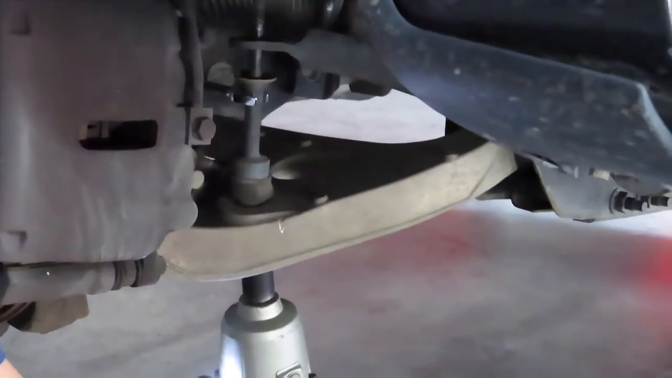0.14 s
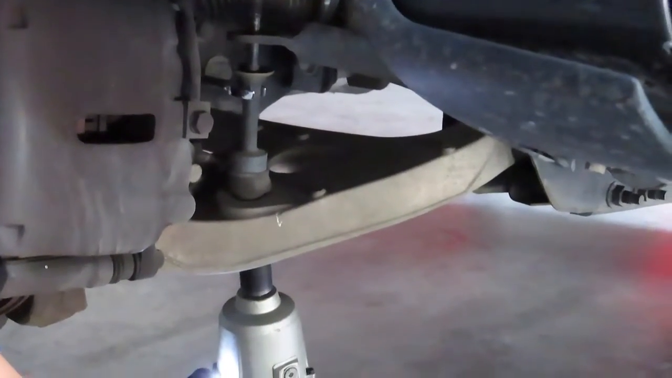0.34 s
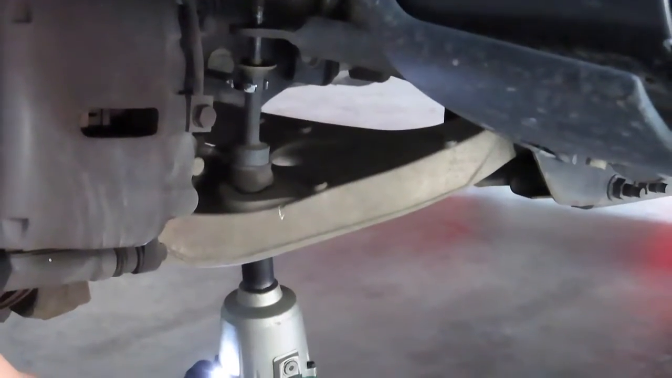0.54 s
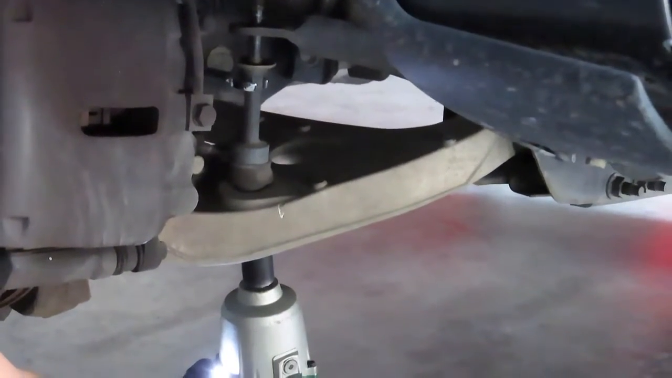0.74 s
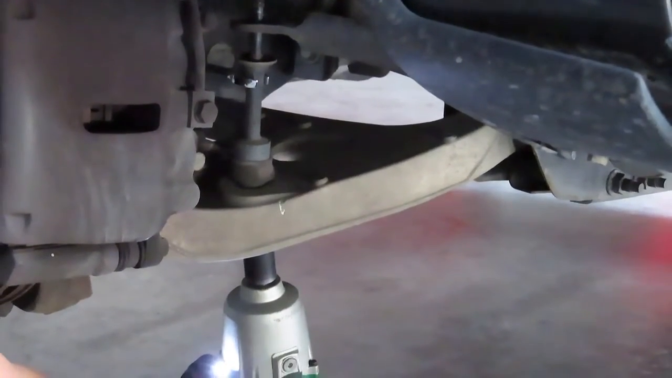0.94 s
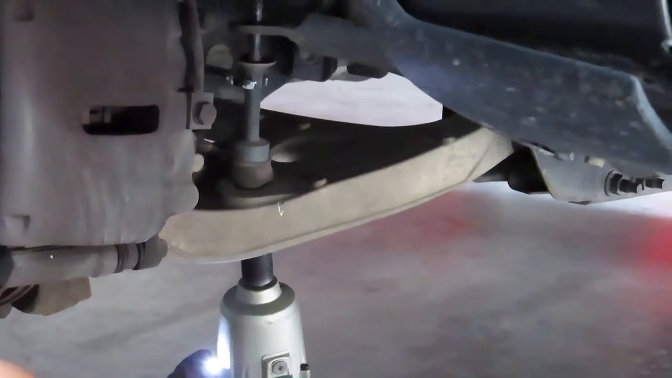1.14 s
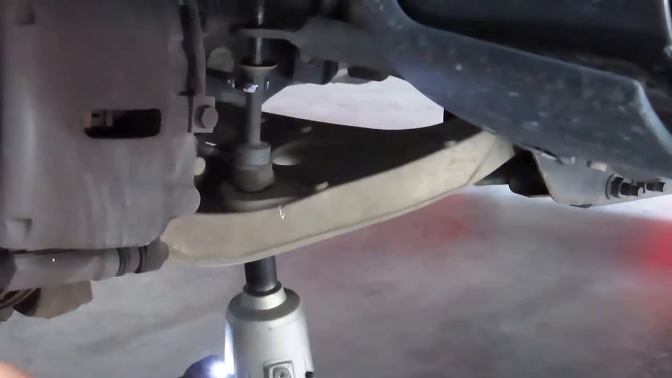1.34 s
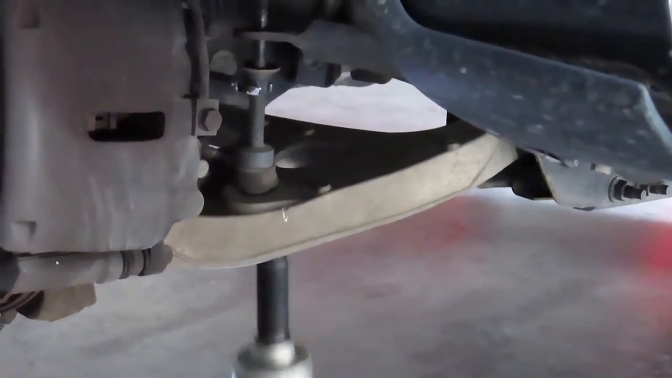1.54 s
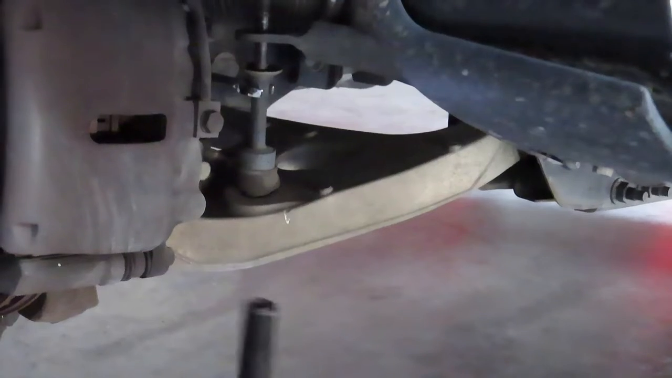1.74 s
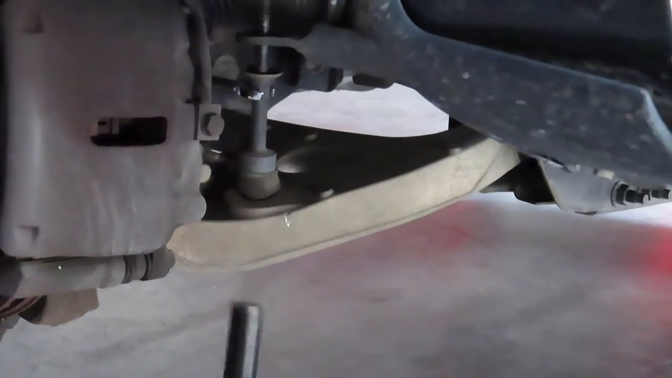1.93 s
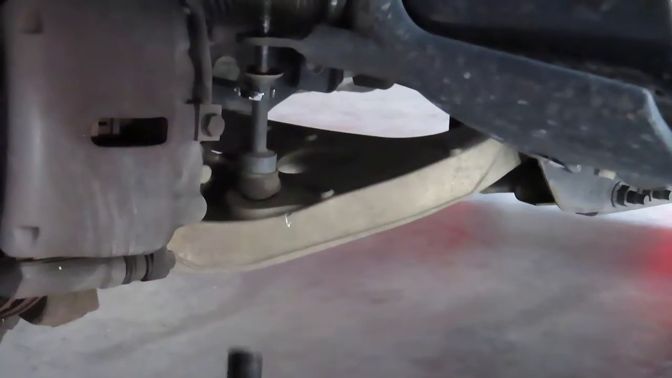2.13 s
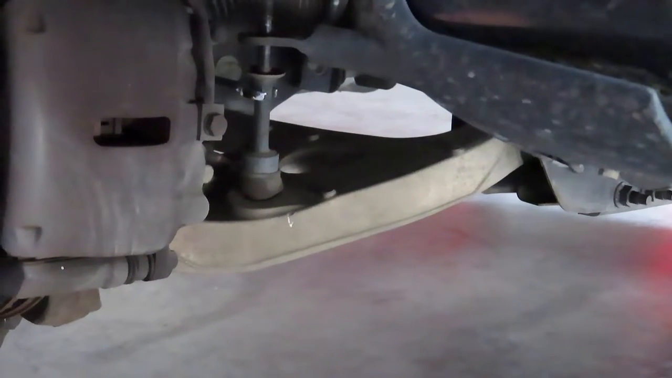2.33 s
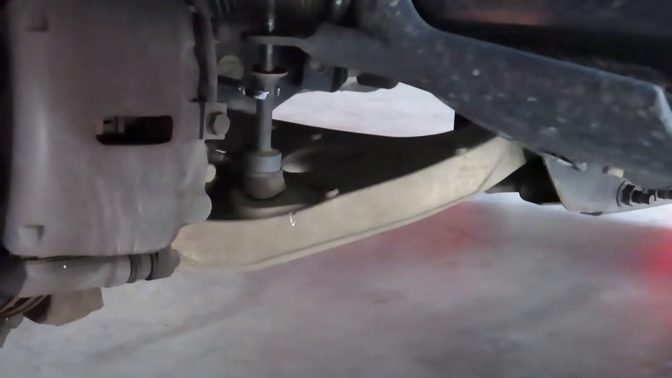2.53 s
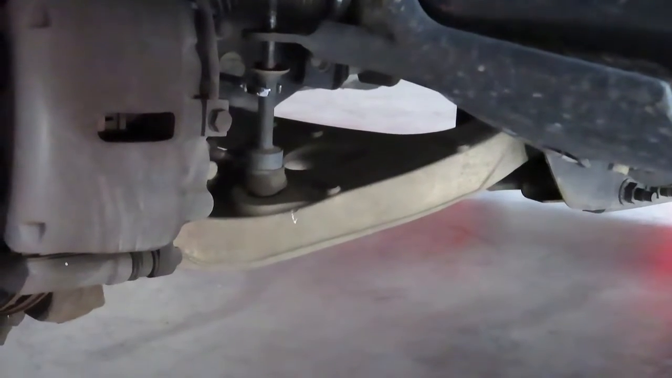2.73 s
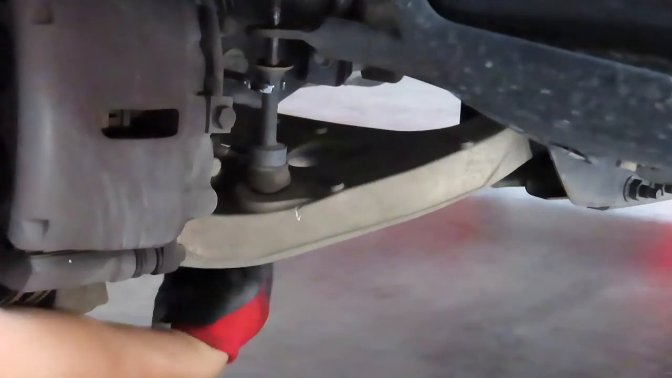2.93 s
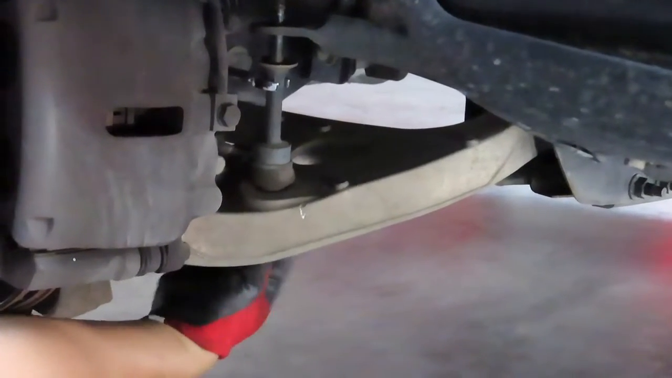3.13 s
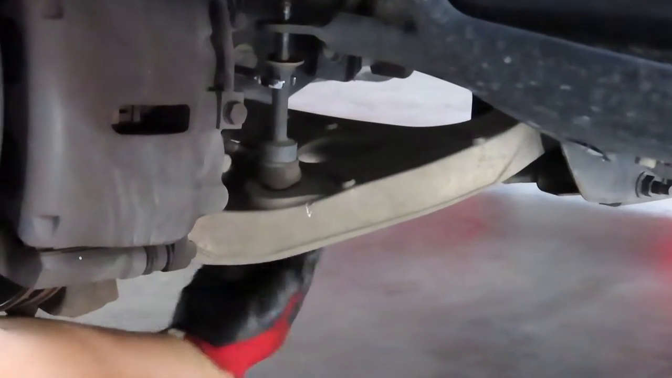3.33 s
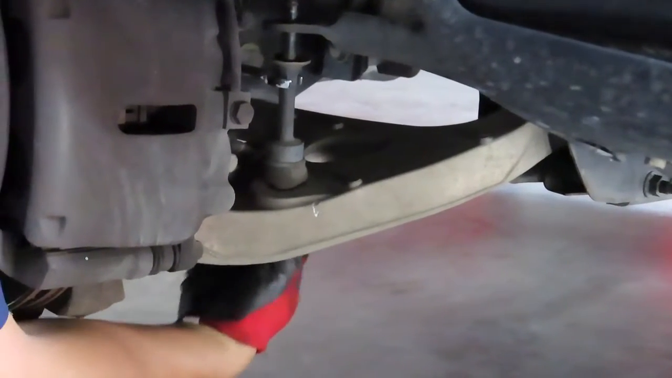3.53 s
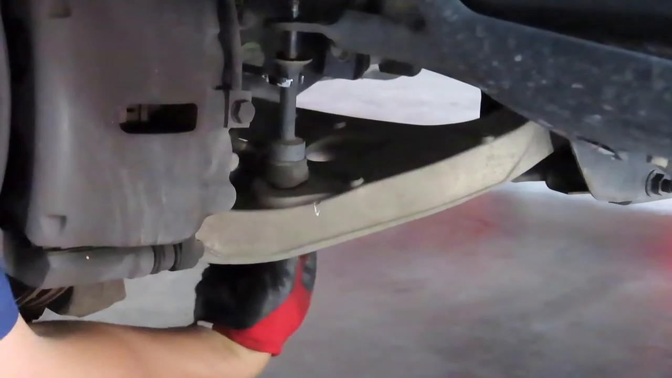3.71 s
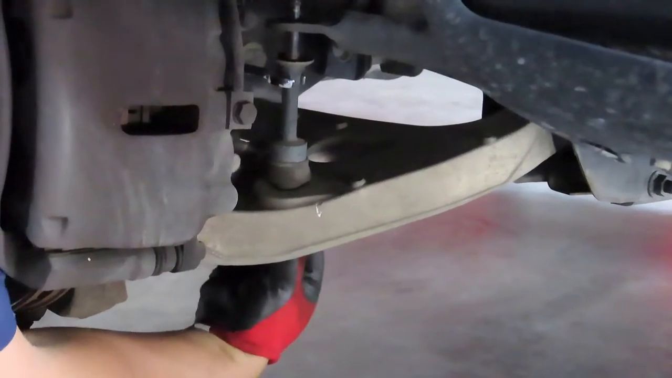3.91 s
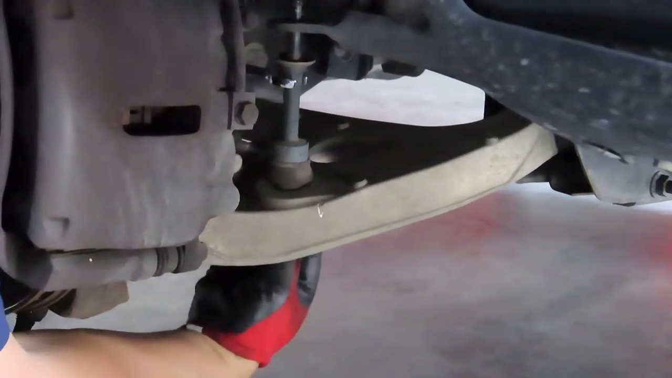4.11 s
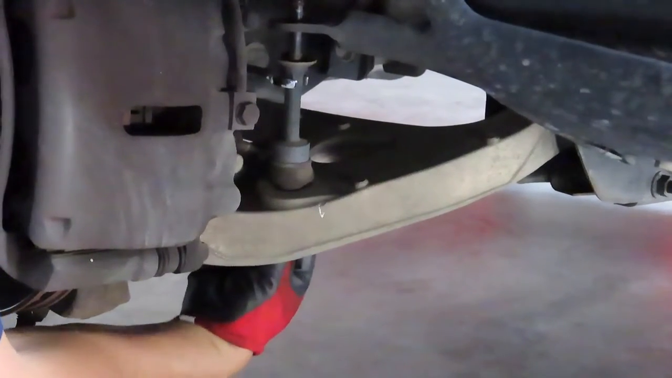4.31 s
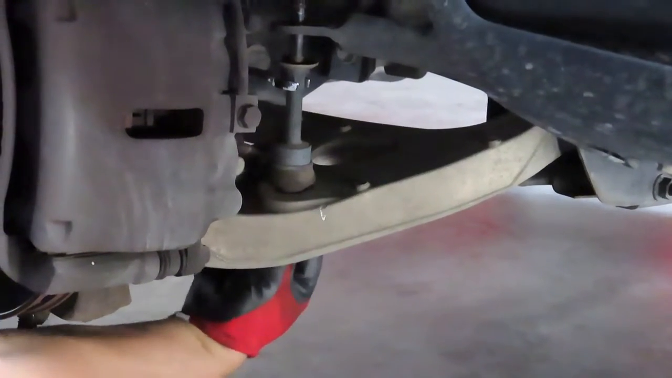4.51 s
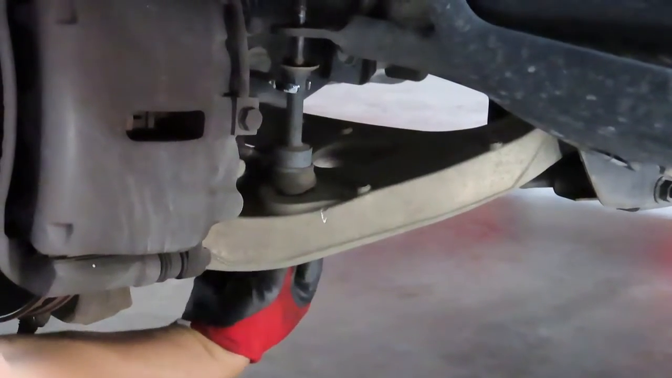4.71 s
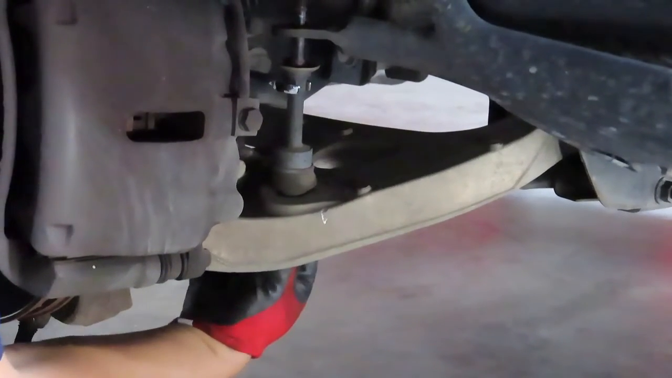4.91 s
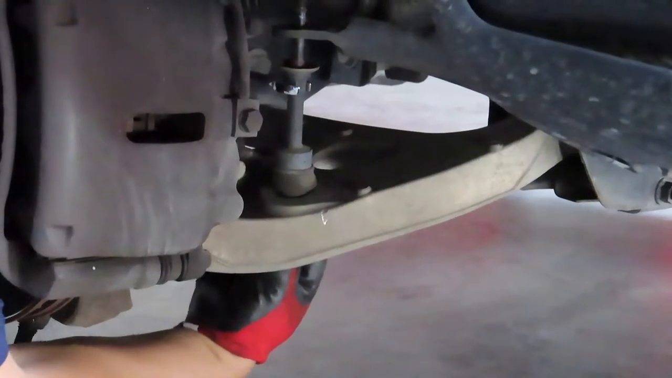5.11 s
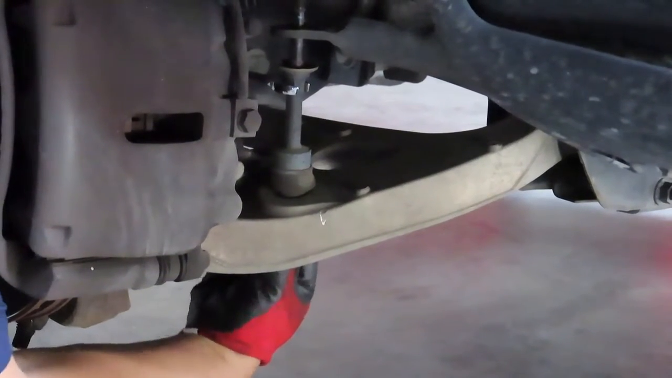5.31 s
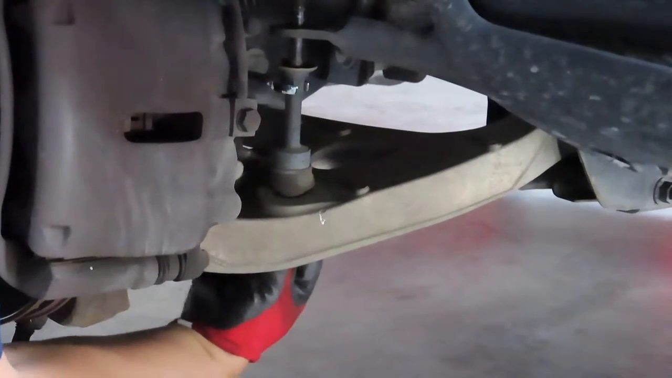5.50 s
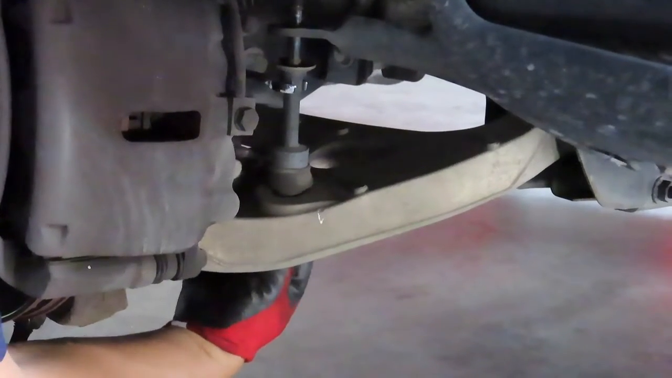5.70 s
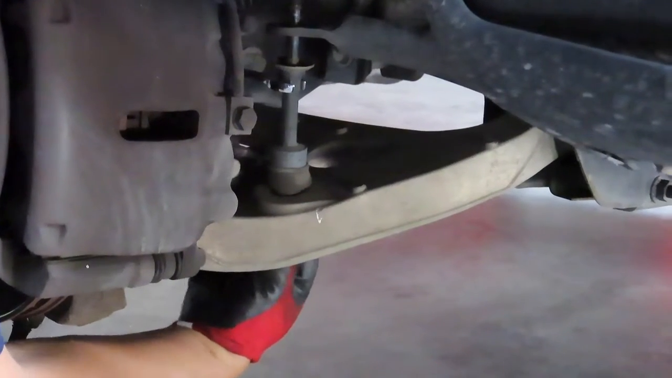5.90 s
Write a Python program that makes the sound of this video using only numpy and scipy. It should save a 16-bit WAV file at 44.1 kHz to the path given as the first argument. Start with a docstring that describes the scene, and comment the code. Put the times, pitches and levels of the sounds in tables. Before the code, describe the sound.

Close under a vehicle, a cordless driver whines steadily with a throbbing gear and rattling socket. It knocks off the nut, whirs freely higher, then coasts down in pitch. Several hard clacks follow as it is laid on concrete. A glove rustles faintly while a distant bird chirps over low traffic rumble.

```python
"""A cordless driver spins a nut off under a car: shaft-locked tones whine, a gear throbs once a turn
and noise patterned by the turn makes the socket rattle. Pulled off with a knock, it whirrs in coloured
noise, coasts down and is laid on concrete; knocks are cracking noise and ringing housing modes. A glove
rustles in grainy noise; a far bird sings two phrases of gliding sines over a rumble of filtered noise."""
import sys
import numpy as np
from scipy import signal
from scipy.fft import rfft, irfft, next_fast_len
from scipy.io import wavfile
from scipy.ndimage import uniform_filter1d

SR = 44100
rng = np.random.default_rng(int(sys.argv[2]) if len(sys.argv) > 2 else 0)


def wrap_up_sound(samples):
    """Save the sound to the file named by the first command line argument, as 16-bit audio."""
    columns = np.atleast_2d(samples).T
    # keep every value between -1 and 1, then stretch to whole-number steps
    tamed = np.clip(columns, -1, 1)
    steps = np.round(tamed * 32767).astype(np.int16)
    wavfile.write(sys.argv[1], SR, steps)


N = 262420
T = np.arange(N) / SR

# traffic spectrum: f/Hz, relative density level/dB
TOWN_COLOUR = [(20, -15.5), (59, -3), (90, -1), (148, -6), (210, -14.5), (349, -20.5), (666, -20),
               (1570, -34), (3500, -39.5), (7300, -50.5), (15500, -61)]
TOWN_DB = -36.5  # rms of the mid
# width of the traffic: f/Hz, side against mid level/dB
TOWN_WIDTH = [(60, -80.5), (200, -17), (380, -10.5), (2400, -6), (8000, -1.5)]
# width of the near sounds: f/Hz, side against mid level/dB
NEAR_WIDTH = [(100, -64.5), (300, -39.5), (1200, -47.5), (3000, -52.5), (5000, -41.5), (8000, -10),
              (13000, -5.5)]
TOP_HZ = 15550

# notes of the bird's phrase: t/s after its start, length/s before any stretch,
# start f/Hz and end f/Hz before the pitch ratio, level/dB on top of the phrase's
BIRD_NOTES = [(-.02, .16, 3150, 3950, -6), (.03, 0.12, 4450, 4430, -6), (.09, .1, 4200, 3400, -6),
              (.15, .17, 3500, 3100, -9)]
# bird phrases: t/s, level/dB, stretch of the held second note (ratio), pitch ratio
BIRD_PHRASES = [(3.239, -45, 1.66, 1.), (3.684, -43.5, 1.16, 0.98)]
# lone high note: t/s, length/s, start f/Hz, end f/Hz, level/dB
HIGH_PEEP = (5.2, .031, 7203, 7528, -57)
# faint far squeal: t/s, f/Hz, level/dB
FAR_SQUEAL = [(5.6, 1715, -70), (5.95, 1810, -60)]

# glove and sleeve: t/s, length/s, level/dB
CLOTH_BURSTS = [(2.904, 0.035, -42), (3.076, 0.035, -51.5), (3.155, 1, -56), (3.21, 0.067, -52.5),
                (3.355, 0.06, -50.5), (3.568, 0.09, -61), (3.646, 0.022, -48), (4.193, 0.083, -56),
                (4.29, .03, -54), (4.863, 0.0074, -48), (4.87, .06, -57), (4.897, 0.0073, -49),
                (5.067, 0.088, -62)]
# socket pulling off the nut, then the tool set down on concrete:
# t/s, crack level/dB, crack centre f/Hz, crack t60/s, thud level/dB, thud centre f/Hz
TOOL_KNOCKS = [(1.558, -16, 7000, 0.039, -26, 490), (1.609, -3, 2140, 0.04, -10, 490),
               (2.099, -38, 397, 0.022, -17, 168), (2.5608, 0, 2470, 0.016, -3.5, 158),
               (2.6234, -1, 2300, 0.022, 2, 360), (2.6299, 3.5, 2400, 0.013, -22, 340),
               (2.686, -16, 1500, 0.026, -13.5, 347), (2.779, -14.5, 910, 0.031, -14, 405),
               (2.7997, -18, 3360, 0.011, -17, 395), (2.819, -5, 2150, 0.0055, -13.5, 299.3),
               (2.8931, -19.5, 784, 0.04, -23, 550)]
# housing modes, low to high: f/Hz, relative level/dB, t60/s
HOUSING_MODES = [(124, -5.5, 0.14), (186.9, 3.5, 0.036), (359, 5.5, 0.031), (474, 5, 0.014),
                 (550, 8, 0.033), (834, 10.5, 0.03), (1900, 7.5, 0.015), (3280, 4, 0.016)]
LOW_MODES = 5  # these make the thud, the rest ring with the crack

# air noise spectrum, also shaping the faint shaft lines: f/Hz, relative density level/dB
AIR_COLOUR = [(150, -9), (480, -16.5), (640, -3), (1550, -0.5), (2150, -3), (3300, -0.5), (5700, -14),
              (8500, -17.5), (15500, -37.5)]
WHIRR_DB, WHIRR_DB_PER_OCTAVE = -26.5, 3.5  # at free speed, and per octave of speed
TREBLE_DB, TREBLE_DB_PER_OCTAVE = 2, -1  # whirr's treble against its body
STOP_HZ = 150  # the fan dies away below this whine
SCRAPE_S, SCRAPE_LENGTH_S, SCRAPE_DB = 2.79, 0.16, -39

# gear throb: t/s, depth 0-1, lead on the motor/turns
GEAR_THROB = [(0, 0.89, 0.31), (.12, 0.89, 0.38), (.2, 0.01, 0.15), (.33, 0.88, 0.012), (.5, 0.96, -0.016),
              (.65, 0.39, 0.015), (.8, 0.98, 0.044), (.92, 0.92, 0.13), (1, 0.48, .14), (1.17, 0.34, 0.26),
              (1.27, 0.48, 0.4), (1.5, 0.51, 0.52)]
# gear overtones: multiple of the mesh tone, mean level/dB against it
MESH_OVERTONES = [(2, -14.5), (3, -19), (6, -28)]
GEAR_DB, GEAR_RISE_DB_PER_S = -17.5, 3
THROB_LOSS_DB, THROB_SAG_HZ = 5.5, 18  # a deeper throb is quieter and a little lower
GEAR_START_TURN, MESH_PER_WHINE, WHINES_PER_TURN = -.15, .553, 121
# socket rattle spectrum: f/Hz, relative density level/dB
SOCKET_COLOUR = [(60, -12.5), (240, -8.5), (500, -11), (1400, -8.5), (2100, -16), (2700, -8.5), (3300, -16),
                 (4200, -19), (6300, -25), (9700, -29), (15500, -41.5)]
# socket resonances: f/Hz, width f/Hz, relative level/dB
SOCKET_RINGS = [(234, 21, -12.5), (371, 8.6, -13), (1613, 30, -10.5), (2870, 28, -12.5), (4010, 380, -11.5),
                (6980, 110, -26), (9630, 16, -18.5), (11300, 73, -31.5)]
RATTLE_DB, RATTLE_SAG_DB_PER_S, RATTLE_THROB_DB = -17, 0.38, 0.5
RATTLE_LOOSE_DB = 2.5  # the rattle drops once the nut is free
RATTLE_END_S, RATTLE_RELEASE_S = 1.641, 0.037

# whine on the nut, 10 x shaft speed: t/s, f/Hz
LOADED_WHINE = [(0, 2600), (.3, 2510), (1.05, 2548), (1.5, 2553)]
SLIP_OFF_S, FREE_HZ, SPIN_UP_S = 1.515, 2885, .038
TRIGGER_OFF_S, DRAG_PER_S, FRICTION_HZ_PER_S = 1.872, .95, 1615
# loudness of the whine as the tool is moved about: t/s, relative level/dB
WHINE_LEVEL = [(0, -3), (.3, -1), (1.1, -2), (1.5, -1.5), (1.56, 0), (1.65, -1), (1.71, -4.5), (1.78, -5.5),
               (1.82, 0), (1.9, -4.5), (1.97, 0), (2.05, -5), (2.13, -1), (2.3, -2.5), (2.42, 0.5),
               (2.5, 2.5), (2.575, -2), (2.76, -13)]
# motor tones: multiple of the whine, level/dB at free speed before the body, level lost/dB per octave of slowing
MOTOR_TONES = [(.1, -45.5, 5.5), (.25, -52, 4), (.55, -39.5, 8.5), (1, -28, 6.5), (1.5, -45, 13.5),
               (2, -45.5, -6.5), (3, -43, 9), (4, -53.5, 6.5), (4.5, -59.5, 21.5), (5, -55, -5),
               (6, -58, 4), (7, -54.5, 8), (8, -62.5, 6)]
# body resonances lifting a tone: f/Hz, width f/Hz, boost level/dB
BODY_RESONANCES = [(690, 364, 15), (2487, 156, 6), (2856, 180, 9), (3388, 330, 11.5), (4010, 500, 14.5),
                   (4347, 76, 11), (6940, 2700, 10.5), (7680, 1300, 0.5), (11700, 695, 3.5),
                   (13200, 1000, 4.5)]
# brief fades of single tones as the tool is turned: multiple of the whine, middle t/s, length/s, level/dB
TONE_FADES = [(1, 1.27, .09, -12), (1.5, 1.845, .07, -18), (3, 1.77, .09, -16), (1, 2.28, .08, -10),
              (5, 2.63, .14, -15), (2, 2.72, .26, -12), (2, 1.98, .12, -8)]
COMB_DB, COMB_STEP = -48, .2  # faint lines at every second shaft order, before air colour


def undb(db):
    """Turns dB into gain."""
    return 10 ** (np.asarray(db) / 20)


def unit(x):
    """Scales to rms 1."""
    return x / np.sqrt(np.mean(x ** 2))


def at_hz(points, hz):
    """Reads (f/Hz, level/dB) points on a log-frequency axis."""
    f, db = np.transpose(points)
    return np.interp(np.log(np.maximum(hz, 1)), np.log(f), db)


def curves(rows):
    """Draws a table's columns per sample; a gain that closes outside the table comes first."""
    s, *columns = np.transpose(rows)
    gate = np.interp(T, [s[0] - .03, s[0], s[-1], s[-1] + .03], [0, 1, 1, 0])
    return [gate] + [np.interp(T, s, column) for column in columns]


def colour(x, points):
    """Weights the spectrum by (f/Hz, level/dB) points."""
    n = next_fast_len(len(x), True)
    hz = np.arange(n // 2 + 1) * SR / n
    return irfft(rfft(x, n) * undb(at_hz(points, hz)), n)[:len(x)]


def band(x, hz, width_hz):
    """Resonates with gain 1 at the centre."""
    return signal.lfilter(*signal.iirpeak(hz, hz / width_hz, fs=SR), x)


def high_pass(x, hz):
    """Rolls off below hz at 12 dB an octave."""
    return signal.sosfilt(signal.butter(2, hz, "high", fs=SR, output="sos"), x)


def walk(rate):
    """Wanders between random levels held 1 / rate s and slewed twice; spread near 1."""
    hold = int(SR / rate)
    steps = np.repeat(rng.standard_normal(N // hold + 1), hold)
    return 1.516 * uniform_filter1d(uniform_filter1d(steps, hold), hold)[:N]


def echoes(x, t60, damp_hz):
    """Smears x into a diffuse tail: a dulled, decaying noise response of unit energy."""
    t = T[:SR // 2]
    tail = rng.standard_normal(len(t)) * 1000. ** (-t / t60)
    tail = signal.lfilter(*signal.butter(1, damp_hz, fs=SR), tail)
    return signal.oaconvolve(x, tail / np.linalg.norm(tail))[:N]


def whine_hz():
    """Whine pitch: sags on the nut, spins up when freed, coasts down against drag and friction."""
    hz = curves(LOADED_WHINE)[1]
    hz = hz + (FREE_HZ - hz) * (1 - np.exp(-(T - SLIP_OFF_S).clip(0) / SPIN_UP_S))
    offset_hz = FRICTION_HZ_PER_S / DRAG_PER_S
    coast = np.exp(-DRAG_PER_S * (T - TRIGGER_OFF_S).clip(0))
    return ((hz + offset_hz) * coast - offset_hz).clip(1)


def freeing():
    """Ramps 0 to 1 as the tool slips off the nut."""
    return np.clip((T - SLIP_OFF_S) / SPIN_UP_S, 0, 1)


def town():
    """Traffic rumble: low-weighted noise that swells slowly; mid and side."""
    mid, side = (colour(rng.standard_normal(N) * undb(.6 * walk(3) + walk(14)), TOWN_COLOUR)
                 for _ in range(2))
    return undb(TOWN_DB) * np.array([mid, colour(side, TOWN_WIDTH)]) / np.sqrt(np.mean(mid ** 2))


def far_tones():
    """Bird notes as sines whose glides warble, and a faint wavering squeal."""
    out, tremble = np.zeros(N), walk(200)
    notes = [HIGH_PEEP]
    for start, phrase_db, stretch, ratio in BIRD_PHRASES:
        for k, (s, length, hz0, hz1, db) in enumerate(BIRD_NOTES):
            length = length * (stretch if k == 1 else 1)
            notes.append((start + s, length, ratio * hz0, ratio * hz1, phrase_db + db))
    for s, length, hz0, hz1, db in notes:
        i, u = int(s * SR), np.linspace(0, 1, int(length * SR))
        warble_hz = (24 + .3 * abs(hz1 - hz0)) * tremble[i:i + len(u)]
        phase = 2 * np.pi * np.cumsum(hz0 + (hz1 - hz0) * u + warble_hz) / SR
        out[i:i + len(u)] += undb(db) * np.sin(np.pi * u) ** .5 * np.sin(phase)
    gate, hz, db = curves(FAR_SQUEAL)
    squeal_phase = 2 * np.pi * np.cumsum(hz * (1 + 0.0111 * walk(90))) / SR
    return out + gate * undb(db) * np.sin(squeal_phase)


def rustles():
    """Cloth and rubber: soft bursts of noise made grainy by random sample levels."""
    grit = rng.standard_normal(N) * undb(1.6 * rng.exponential(size=N))
    # the power below 1 makes each burst rise fast and fade slowly
    swell = sum(undb(db) * np.sin(np.pi * np.clip((T - s) / length, 0, 1) ** 0.41)
                for s, length, db in CLOTH_BURSTS)
    return swell * unit(colour(grit, [(200, -44), (1500, 8.0), (5000, -1.5), (14000, -21.0)]))


def knocks():
    """Blows of tick, crack, thud and housing ring; modes near the thud and crack centres ring most."""
    out, t = np.zeros(N), T[:SR // 5]
    modes = np.array([undb(db) * np.sin(2 * np.pi * f * t) * 1000. ** (-t / t60)
                      for f, db, t60 in HOUSING_MODES])
    mode_hz = np.array(HOUSING_MODES)[:, :1]
    for s, crack_db, crack_hz, decay, thud_db, thud_hz in TOOL_KNOCKS:
        noise = rng.standard_normal(len(t))
        crack = band(band(noise, crack_hz, 1.1 * crack_hz), crack_hz, 1.04 * crack_hz)
        crack = crack * 1000. ** (-t / decay)
        tick = 0.17 * noise * 1000. ** (-t / 0.0031)
        octaves_off = np.abs(np.log2(mode_hz / np.where(mode_hz < 700, thud_hz, crack_hz)))
        ring = modes * undb(2 * rng.standard_normal((len(modes), 1)) - 10.1 * octaves_off)
        thud = sum(ring[:LOW_MODES])
        blow = undb(crack_db) * (crack / np.abs(crack).max() + tick + .3 * sum(ring[LOW_MODES:]))
        blow = blow + undb(thud_db) * thud / np.abs(thud).max()
        i = int(s * SR)
        out[i:i + len(t)] += blow * np.minimum(t / .0005, 1)
    return out


def whirr():
    """Air and bearing noise of the free motor, sinking with speed; a brief scrape as the tool settles."""
    hz = whine_hz()
    speed, octaves = hz / FREE_HZ, np.log2(hz / FREE_HZ)
    shaft = np.cos(2 * np.pi * np.cumsum(hz) / SR / 10)  # the noise pulses once a shaft turn
    pulsed = rng.standard_normal(N) * undb(.9 * walk(40) + 3 * shaft * speed)
    air = unit(colour(pulsed, AIR_COLOUR))
    treble = high_pass(air, 5000)
    running = freeing() * np.clip(hz / STOP_HZ, 0, 1)
    fan = running * undb(WHIRR_DB + WHIRR_DB_PER_OCTAVE * octaves)
    scrape = undb(SCRAPE_DB) * np.sin(np.pi * np.clip((T - SCRAPE_S) / SCRAPE_LENGTH_S, 0, 1))
    treble_gain = undb(TREBLE_DB + TREBLE_DB_PER_OCTAVE * octaves)
    return (fan + scrape) * (air - treble) + fan * treble_gain * treble


def gear_turn():
    """Gear angle in turns, and its throb: an off-centre gear swells once a turn."""
    _, depth, lead = curves(GEAR_THROB)
    turn = np.cumsum(whine_hz()) / SR / WHINES_PER_TURN + GEAR_START_TURN + lead
    throb = 1 + depth * (np.cos(2 * np.pi * turn) + 0.62 * np.cos(4 * np.pi * turn - .4))
    return turn, throb


def gear(throb):
    """Tooth-mesh tone and overtones that follow the motor speed, shaken by the throb."""
    gate, depth, _ = curves(GEAR_THROB)
    hz = MESH_PER_WHINE * whine_hz() - THROB_SAG_HZ * depth
    phase = 2 * np.pi * np.cumsum(hz * (1 + 0.00323 * walk(40.2))) / SR
    tone = np.sin(phase)
    for m, overtone_db in MESH_OVERTONES:
        tone = tone + undb(overtone_db + 3 * walk(30)) * np.sin(m * phase)
    db = GEAR_DB + GEAR_RISE_DB_PER_S * T - THROB_LOSS_DB * depth
    return gate * undb(db + 1.15 * walk(27.64)) * throb * tone


def socket_rattle(turn, throb):
    """Socket chatter: noise slaps that partly repeat each turn, coloured and ringing on the nut."""
    pattern = rng.standard_normal(2048)[(turn % 1 * 2048).astype(int)]
    slaps = 0.73 * pattern + rng.standard_normal(N)
    slaps = slaps * undb(walk(150) + RATTLE_THROB_DB * throb)
    rings = sum(undb(db) * unit(band(slaps, f, width)) for f, width, db in SOCKET_RINGS)
    on_nut = curves(GEAR_THROB)[0]
    chatter = unit(colour(slaps, SOCKET_COLOUR)) + .5 * rings * on_nut
    release = np.clip(1 - (T - RATTLE_END_S) / RATTLE_RELEASE_S, 0, 1)
    db = RATTLE_DB - RATTLE_SAG_DB_PER_S * T - RATTLE_LOOSE_DB * freeing()
    return release * undb(db) * chatter


def motor():
    """Shaft-locked tones, dulled and trembling more under load, that flicker and swell at resonances."""
    n = int(3 * SR)  # the whine is silent after this
    gate, whine_db, hz, load = (x[:n] for x in (*curves(WHINE_LEVEL), whine_hz(), curves(GEAR_THROB)[0]))
    tremble = (0.0012 + 0.0028 * load) * walk(90)[:n]
    phase = 2 * np.pi * np.cumsum(hz * (1 + tremble)) / SR
    flicker = [walk(29.88), walk(45.14), walk(59.87)]
    slowing = np.log2(hz / FREE_HZ)
    out = np.zeros(n)
    for k, (m, tone_db, loss_db) in enumerate(MOTOR_TONES):
        body_db = sum(db / (1 + (2 * (m * hz - f) / width) ** 2) for f, width, db in BODY_RESONANCES)
        fade_db = sum(db * np.exp(-(2 * (T[:n] - s) / length) ** 4)
                      for fade_m, s, length, db in TONE_FADES if abs(fade_m / m - 1) < .06)
        flicker_db = (2.13 + load * (0.43 * m - 1.1)) * flicker[k % 3][:n]
        db = whine_db + tone_db - load * m + loss_db * slowing + flicker_db + body_db + fade_db
        out += (m * hz < TOP_HZ) * undb(db) * np.sin(m * phase)
    # faint shaft lines once the motor runs free, each flickering at its own time
    free_gain = (1 - load) * np.clip(hz / FREE_HZ, 0, 1)
    for k, m in enumerate(np.arange(COMB_STEP, 8, COMB_STEP)):
        db = COMB_DB + at_hz(AIR_COLOUR, m * hz) + 5 * np.roll(flicker[0], k * 4999)[:n]
        out += free_gain * (m * hz < TOP_HZ) * undb(db) * np.sin(m * phase + k ** 2)
    return np.pad(np.sqrt(2) * gate * out, (0, N - n))


def scene():
    """Near tool under the car, far sounds mostly as echo; mid and side to left and right."""
    far, hits, whine = far_tones(), knocks(), motor()
    turn, throb = gear_turn()
    near = whine + gear(throb) + socket_rattle(turn, throb) + whirr() + hits + rustles()
    near = high_pass(near, 95)  # small parts radiate no deep bass
    near = near + undb(-12.5) * echoes(hits, 0.24, 2810.0) + undb(-8.5) * echoes(whine, 0.24, TOP_HZ)
    mid = near + .5 * far + echoes(far, .45, 6000.)
    # the treble differs unsteadily between left and right
    side = colour(echoes(near * walk(120), 0.225, TOP_HZ), NEAR_WIDTH)
    side = side + undb(-8) * echoes(far, 0.27, 9000.)
    # left and right differ a little in colour
    side = side - undb(-29.0) * band(near, 1400, 500) + undb(-30.5) * band(near, 2700, 900)
    mid, side = np.array([mid, side]) + town()
    return np.array([mid + side, mid - side])


def record(dry):
    """Clips the loudest peaks, then cuts the top steeply."""
    top_cut = signal.ellip(10, .2, 70, TOP_HZ, fs=SR, output="sos")
    return signal.sosfilt(top_cut, np.clip(dry, -.93, .93))


dry = scene()
out = record(dry)
wrap_up_sound(out)
```